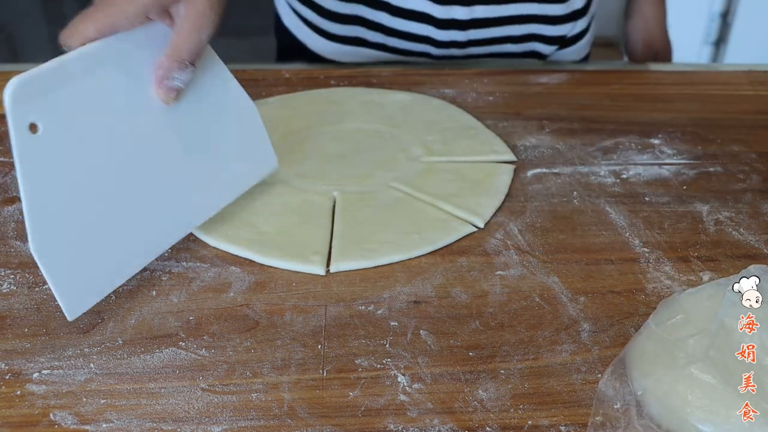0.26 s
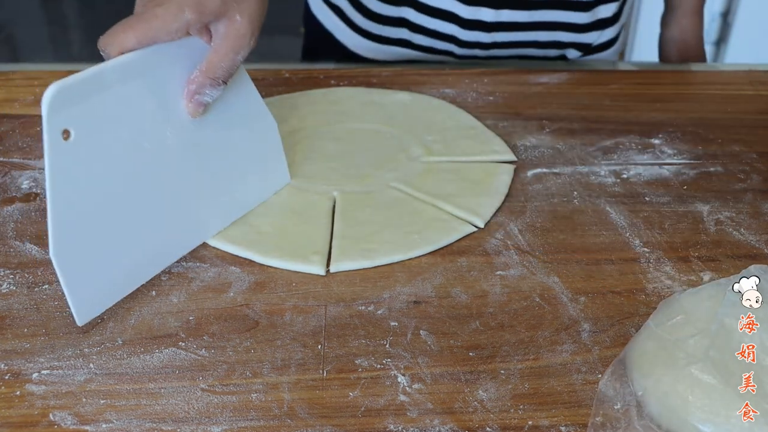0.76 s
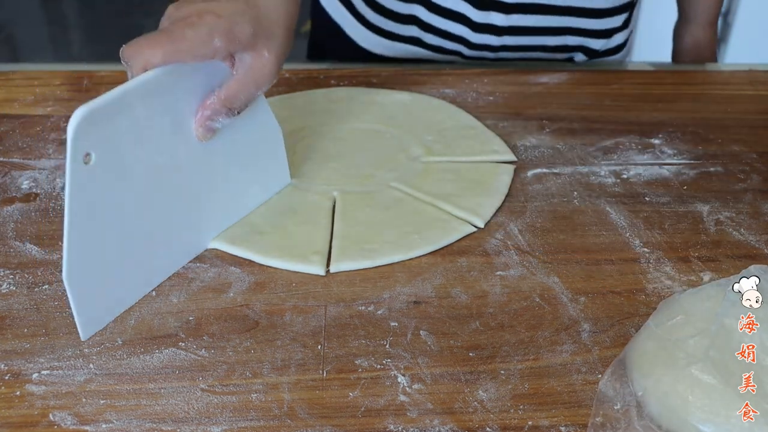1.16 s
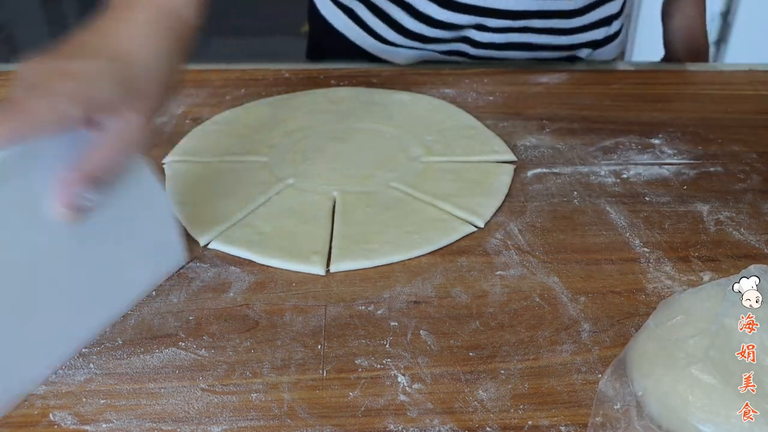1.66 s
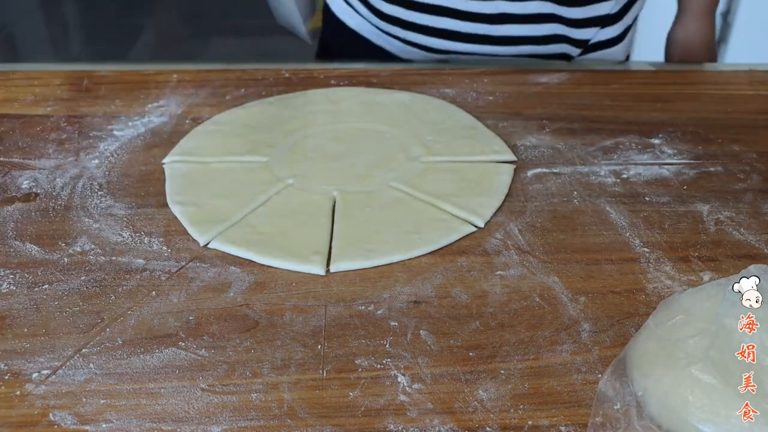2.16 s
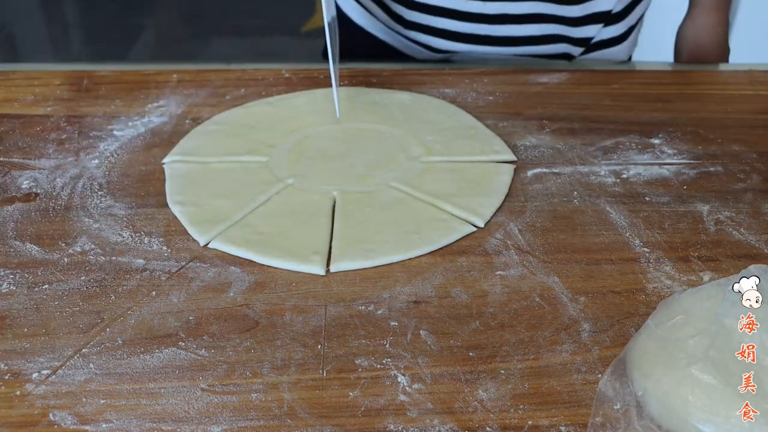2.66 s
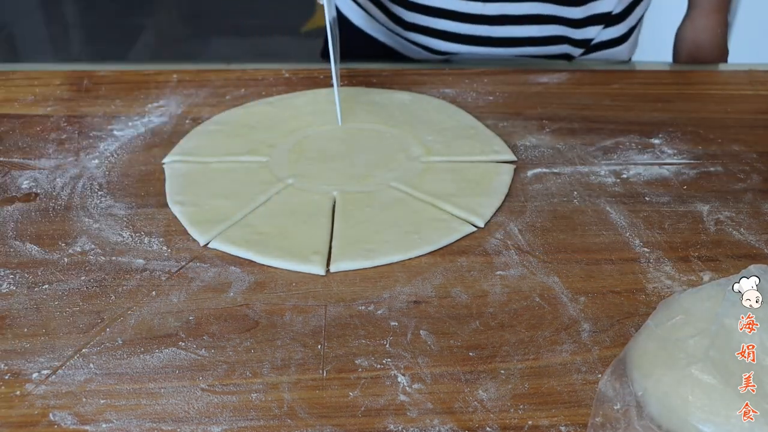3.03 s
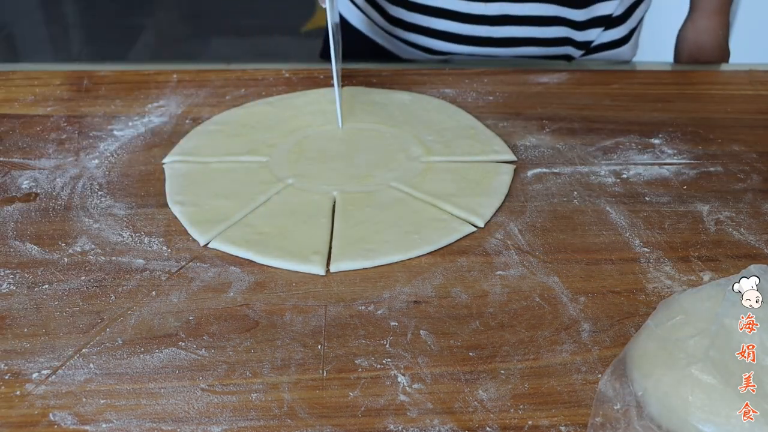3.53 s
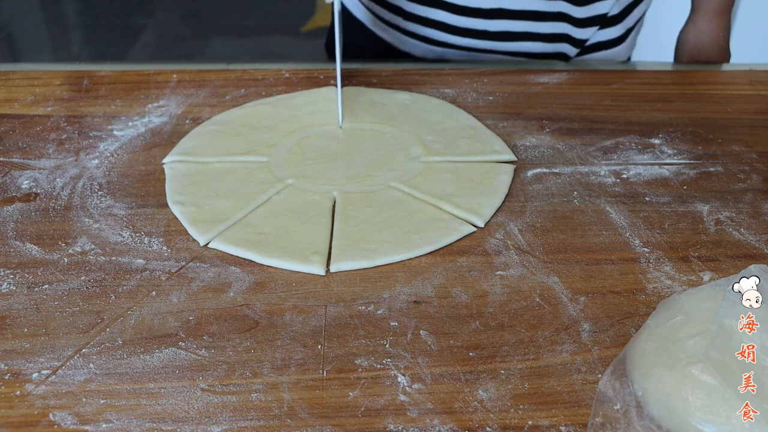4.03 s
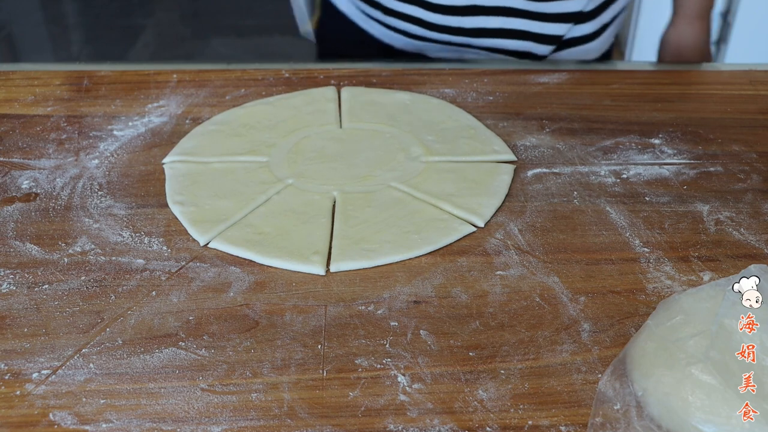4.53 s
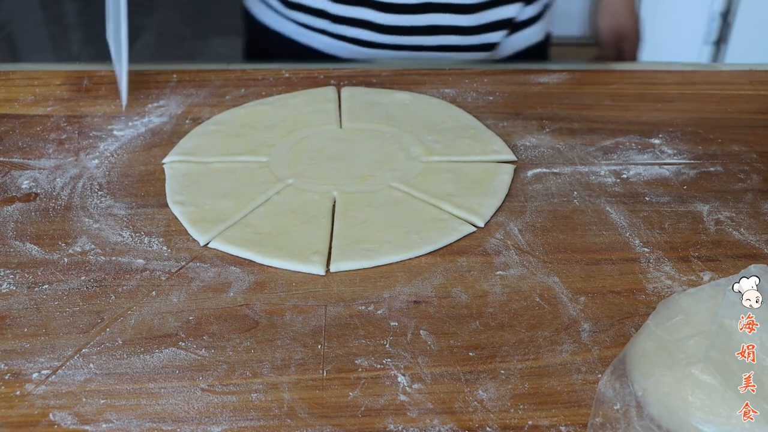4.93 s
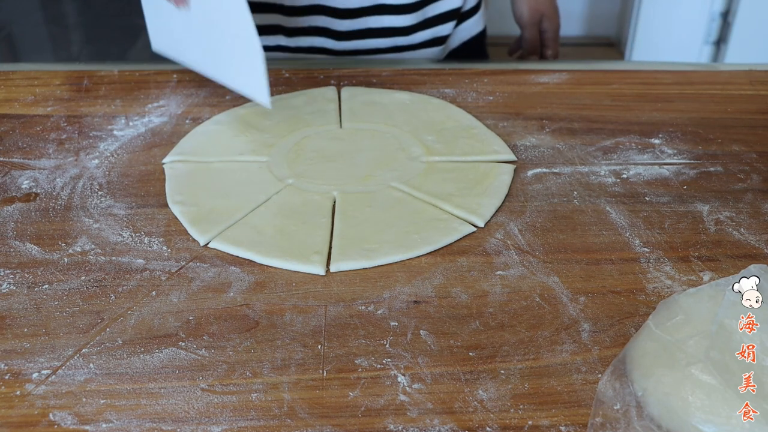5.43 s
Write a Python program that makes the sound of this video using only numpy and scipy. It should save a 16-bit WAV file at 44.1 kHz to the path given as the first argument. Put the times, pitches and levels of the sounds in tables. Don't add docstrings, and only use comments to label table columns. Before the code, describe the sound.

Close stereo view of a plastic scraper cutting dough on a floured wooden board: sleeve rustle, small ticks and a low creaking press, a short ringing gritty drag, quiet rustling, then a chattering landing, a second drag and one hard rap on the wood, echoing in a live kitchen over faint appliance hum.

```python
import sys
import numpy as np
from scipy import signal
from scipy.fft import rfft, irfft
from scipy.io import wavfile
from scipy.ndimage import uniform_filter1d

SR = 44100
rng = np.random.default_rng(int(sys.argv[2]) if len(sys.argv) > 2 else 0)


def magnitude_from_level(level_db):
    exponent = np.asarray(level_db, float) / 20
    return 10 ** exponent


def to_wav(s):
    ch = np.atleast_2d(s).T
    pcm = np.round(np.clip(ch, -1, 1) * 32767)
    wavfile.write(sys.argv[1], SR, pcm.astype(np.int16))


N = 250929
RAP_S = 5.07485


def evened(x):
    return x / np.sqrt(np.mean(x ** 2) + 1e-20)


def read(points, hz):
    f, value = np.transpose(points)
    return np.interp(np.log(hz + 1), np.log(f + 1), value)


def add(mix, s, sound):
    part = mix[..., round(s * SR):][..., :sound.shape[-1]]
    part += sound[..., :part.shape[-1]]


def resonate(x, hz, width):
    turn = np.exp(2j * np.pi * np.cumsum(hz * np.ones(len(x))) / SR)
    r = np.exp(-np.pi * width / SR)
    return 2 * (turn * signal.lfilter([1 - r], [1, -r], x / turn)).real


def coloured(x, points):
    length = x.shape[-1]
    gain = magnitude_from_level(read(points, np.fft.rfftfreq(length, 1 / SR)))
    return evened(irfft(rfft(x) * gain, length))


def grit(length, per_s, spread_db):
    size = rng.standard_normal(length) * magnitude_from_level(spread_db * np.minimum(rng.exponential(1, length), 3))
    return size * (rng.random(length) < per_s / SR)


def placed(x, pan_db):
    return np.array([x * magnitude_from_level(pan_db / 2), x * magnitude_from_level(-pan_db / 2)])


def ring(hz, t60, contact_ms, length=12000):
    t = np.arange(length) / SR
    onset = 1 - np.exp(-(1000 * t / contact_ms) ** 2)
    return magnitude_from_level(-60 * t / t60) * np.sin(2 * np.pi * hz * t) * onset


def fade(length):
    return signal.windows.tukey(length, min(500 / length, 1))


def swell(peak, rise, fall):
    t = np.arange(max(peak - rise, 0), peak + fall, 1 / SR)
    ends_db = -23
    return t[0], ends_db * np.where(t < peak, (peak - t) / rise, (t - peak) / fall)


# (f/Hz, level/dB per Hz)
AIR_COLOUR = [(15, -45), (30, -14), (65, -11.5), (120, -14), (150, -13), (200, -7.5), (300, -11.5),
              (600, -12), (1150, -16), (1900, -22), (5000, -31), (12500, -36), (15700, -47)]
# (f/Hz, likeness)
AIR_LIKENESS = [(40, 0.93), (150, 0.85), (300, 0.85), (600, 0.51), (1200, 0.37), (2400, 0.027),
                (6000, 0.028), (15000, 0.009)]
# (f/Hz, left-right level/dB)
AIR_TILT = [(60, -2.5), (240, -0.2), (950, -0.9), (3800, -1.1), (15000, -.4)]


def air():
    frames, hz = N // 512 + 5, np.fft.rfftfreq(2048, 1 / SR)
    a, b, c, d, patches = rng.standard_normal((frames, 1025, 5)).T
    patches = evened(uniform_filter1d(uniform_filter1d(patches, 20, 0), 8, 1))
    same = read(AIR_LIKENESS, hz)[:, None]
    left = a + 1j * b
    right = same * left + np.sqrt(1 - same ** 2) * (c + 1j * d)
    colour = placed(magnitude_from_level(read(AIR_COLOUR, hz)), read(AIR_TILT, hz))[:, :, None]
    z = np.array([left, right]) * colour * magnitude_from_level(1.3 * patches)
    return magnitude_from_level(-54) * evened(signal.istft(z, nperseg=2048, noverlap=1536)[1][:, :N])


# (f/Hz, width/Hz, level/dB, steady share)
APPLIANCE_TONES = [(64, 17, -65, .1), (98.3, 2, -61, 0.7), (134.5, 10, -57.5, 0.71),
                   (212.5, 9.4, -57.5, 0.36), (428, 4.8, -84, .2), (501.5, 15, -67.5, 0.21),
                   (634.4, 7.5, -66.5, 0.28)]


def appliances():
    out = np.zeros(N)
    for hz, width, db, steady in APPLIANCE_TONES:
        tone = np.sqrt(2) * np.sin(2 * np.pi * (hz * np.arange(N) / SR + rng.random()))
        waver = evened(resonate(rng.standard_normal(N), hz, width))
        out += magnitude_from_level(db) * (steady * tone + (1 - steady) * waver)
    return out


# (f/Hz, level/dB per Hz)
RUSTLE_BODY = [(1200, 6.5), (2200, 9), (3500, 5.5), (4800, 2.5), (6500, -13.5), (12000, -20)]


def rustle(level_db, body_db, pan_db, fizz):
    length = len(level_db)
    shared = grit(length, 14000, 2.7)
    grains = np.array([0.35 * shared + grit(length, 12000, 2.1) for ear in "lr"])
    mix = coloured(grains, fizz) + magnitude_from_level(body_db) * coloured(grains, RUSTLE_BODY)
    return mix * placed(magnitude_from_level(level_db) * fade(length), pan_db)


# (f/Hz, level/dB per Hz)
CLOTH_FIZZ = [(4000, -7), (6500, -4), (9000, -6.5), (12000, -3), (14000, -8), (15600, -17), (16200, -45)]
# (peak t/s, rise t/s, fall t/s, level/dB, relative body level/dB)
SWISHES = [(.012, 0.055, 0.14, -55, -12), (.15, 0.11, .6, -74, 0), (.65, 0.031, 0.027, -67.5, 10.5),
           (.858, 0.051, .03, -73, -8), (1.15, 0.62, 0.17, -73, 10), (1.752, 0.054, .08, -60.5, 9),
           (1.885, .05, .14, -56, -7), (1.964, 0.097, .1, -54.5, -5), (2.152, .18, .3, -55, -5.5),
           (2.43, 0.49, 0.17, -64, -3), (2.5, .06, .08, -72.5, 14), (3.658, .03, .04, -70, 6),
           (3.92, .01, 0.082, -69, 9), (4.55, .3, .9, -63, -1), (1.81, .1, .1, -68, 6),
           (4.698, .04, 0.089, -54, -8), (5.07, .12, 0.13, -62, 0), (5.216, 0.095, 0.12, -56, -5),
           (5.27, 0.053, 0.17, -68, 12.5)]


def swishes():
    out = np.zeros((2, N))
    for peak, rise, fall, db, body_db in SWISHES:
        s, shape_db = swell(peak, rise, fall)
        add(out, s, rustle(db + shape_db, body_db, -.3, CLOTH_FIZZ))
    return out


# (f/Hz, level/dB per Hz)
FLOUR_FIZZ = [(4000, -9), (6500, -5.5), (9000, -7), (12000, -4), (14000, -9), (16000, -45)]
# (t/s, peak level/dB, f/Hz, relative treble level/dB, left-right level/dB)
TICKS = [(.1094, -54, 4000, 3, -2), (.142, -68, 4000, 6.5, 0), (.2044, -63, 4000, 9, -2),
         (0.3137, -62, 4000, 7.5, -1), (.39, -63, 4000, 7, -1), (0.4583, -38.5, 1630, -20, -5),
         (0.51, -58, 4000, 4, -1), (.6464, -52, 4300, -10.5, -5), (0.7279, -43, 4400, -7.5, -2),
         (0.7717, -38, 1400, -19.5, -1), (0.8085, -44, 4300, -11, -1), (.839, -63, 4000, 5, -1),
         (.8564, -62.5, 4000, 11, 0), (0.8981, -33, 1200, -27, 0), (.9344, -64, 4000, 5, -1),
         (1.068, -43, 3950, -7, -1), (1.1832, -31, 900, -30, -3), (1.2221, -31, 1500, -32, -1),
         (1.8734, -37, 2040, -14, -7), (3.6572, -41.5, 2070, -17, -1), (5.3648, -38, 1500, -28, -5)]


def ticks():
    out = np.zeros((2, N))
    for s, db, hz, treble_db, pan_db in TICKS:
        spit_db = treble_db - 60 * np.arange(400) / SR / 0.0053
        spit = coloured(rng.standard_normal(400), FLOUR_FIZZ) * magnitude_from_level(spit_db)
        crack = ring(hz, .004, .12, length=400) + spit
        add(out, s, placed(magnitude_from_level(db) * crack, np.clip(pan_db, -6, 6)))
    return out


# (left t/ms, left signed gain, right t/ms, right signed gain)
WALL_ECHOES = [(10.1, .2, 9.3, .25), (11.5, .16, 10.6, -.45), (12.6, .4, 13.5, .33),
               (16.2, .27, 14.9, -.22), (19.3, -.14, 16, .28), (22.2, .15, 21, -.3),
               (26.5, .23, 28.7, -.17), (43.8, -.15, 38.5, .28)]


def echoes(x):
    taps = np.zeros((2, 2500))
    for left_ms, left, right_ms, right in WALL_ECHOES:
        taps[0, round(left_ms * SR / 1000)] = left
        taps[1, round(right_ms * SR / 1000)] = right
    taps = signal.lfilter(*signal.butter(1, [300 / (SR / 2), 3200 / (SR / 2)], "band"), taps)
    return signal.oaconvolve(x.mean(0)[None], taps, axes=1)[:, :N]


# (f/Hz, t60/s)
KITCHEN_DECAY = [(130, 0.15), (300, 0.63), (600, 0.63), (1200, 0.54), (2400, 0.6), (5000, 0.6),
                 (12000, 0.49)]
# (f/Hz, likeness)
TAIL_LIKENESS = [(60, .98), (180, .98), (300, .93), (640, .55), (1400, .2), (3100, .1), (15000, .1)]


def kitchen(x):
    taps = np.zeros((2, SR))
    at = np.arange(320, SR - 20, 20) + rng.integers(0, 20, (2, (SR - 321) // 20))
    np.put_along_axis(taps, at, rng.choice([-1., 1.], at.shape), 1)
    hz, t, z = signal.stft(taps, SR, nperseg=256)
    same = read(TAIL_LIKENESS, hz)[:, None]
    z[1] = same * z[0] + np.sqrt(1 - same ** 2) * z[1]
    fall_db = -60 * t / read(KITCHEN_DECAY, hz)[:, None]
    decay = magnitude_from_level(1.39 * fall_db) + magnitude_from_level(-7.5 + 0.66 * fall_db)
    tail = signal.istft(z * decay, SR, nperseg=256)[1]
    tail *= 1 - np.exp(-np.arange(tail.shape[1]) / SR / 0.0023)
    return signal.fftconvolve(x[None], tail / np.linalg.norm(tail[0]), axes=1)[:, :N]


# (f/Hz, level/dB per Hz)
BLADE_COLOUR = [(300, -37.5), (600, -5.5), (800, 8.5), (1000, 4.5), (1500, 5), (2300, -7), (3300, -15.5),
                (6000, -38), (12000, -54)]


def scrape(level_db, rumble_db, low_hz, high_hz, ring_db, upper_db):
    length = len(level_db)
    judder = evened(uniform_filter1d(uniform_filter1d(rng.standard_normal(length), 700), 700))
    slips = grit(length, 9000, 2.0) * magnitude_from_level(0.9 * judder)
    wobble, catch = (evened(uniform_filter1d(rng.standard_normal(length), 900)) for k in "ab")
    lower = magnitude_from_level(ring_db) * evened(resonate(slips, low_hz * (1 + 0.024 * wobble), 69))
    upper = magnitude_from_level(upper_db - 2 + 2 * catch) * evened(resonate(slips, high_hz, 300))
    blade = (coloured(slips, BLADE_COLOUR) + lower + upper) / np.sqrt(1 + magnitude_from_level(ring_db) ** 2)
    board = evened(resonate(resonate(slips, 350, 380), 350, 380))
    return (magnitude_from_level(level_db) * blade + magnitude_from_level(rumble_db) * board) * fade(length)


# (peak t/s, rise t/s, fall t/s, board rumble level/dB, relative blade level/dB)
PUSHES = [
    (1.15, .5, 0.38, -57.5, -1),
    (1.07, .03, 0.11, -56, -5),
    (1.235, .08, .08, -54, -8),
    (1.748, .08, .05, -46, -2),
    (1.892, 0.039, 0.046, -68.5, 12),
    (3.83, .2, 0.071, -53, -3),
    (3.885, .02, .06, -56, -7),
    (4.05, 0.029, 0.11, -53, -3),
    (4.466, .04, .08, -49.5, -8),
    (4.01, .05, .08, -49, -12),
]


def pushes():
    out = np.zeros((2, N))
    for peak, rise, fall, db, blade_db in PUSHES:
        s, shape_db = swell(peak, rise, fall)
        sound = scrape(db + blade_db + shape_db, db + shape_db, low_hz=880, high_hz=2080,
                       ring_db=-8, upper_db=-17)
        add(out, s, placed(sound, -1.5))
    return out


# (t/s, pressure level/dB, lower blade ring f/Hz)
DRAGS = [
    [(1.25, -68, 1290), (1.305, -51, 1390), (1.376, -44, 1310), (1.42, -46.5, 1340), (1.445, -42.5, 1330),
     (1.51, -46, 1310), (1.63, -46, 1530), (1.72, -47.5, 1140), (1.80, -66, 1150)],
    [(4.05, -61, 1220), (4.1, -51.5, 1370), (4.165, -48, 1420), (4.224, -50, 1490), (4.3, -48, 1200),
     (4.414, -45, 1300), (4.455, -48.5, 990), (4.5, -57.5, 930), (4.62, -64, 900)],
]
# (lower ring level/dB, upper ring first f/Hz, last f/Hz, upper level/dB, left-right level/dB)
GRIPS = [
    (-4, 2050, 2000, -7, -5),
    (-6.5, 1700, 2500, -3, -1.5),
]
# (relative level/dB, relative body level/dB, left-right level/dB)
FLOUR_HISS = [
    (-8, 8.5, 1.5),
    (-14, 5, -1),
]


def stroke(rows, grip, flour):
    s, level, bend = np.transpose(rows)
    t = np.arange(s[0], s[-1], 1 / SR)
    ring_db, first_hz, last_hz, upper_db, pan_db = grip
    hiss_db, body_db, hiss_pan_db = flour
    mid_db = -45.5
    over_db = np.interp(t, s, level) - mid_db
    sound = scrape(mid_db + over_db, -61.5 + .3 * over_db, np.interp(t, s, bend),
                   np.linspace(first_hz, last_hz, len(t)), ring_db, upper_db + .7 * over_db)
    pressed_db = 1.3 * np.minimum(over_db, -4.5)
    sag_db = 9 * (t - t.mean())
    hiss = rustle(mid_db + hiss_db + pressed_db - sag_db, body_db, hiss_pan_db, FLOUR_FIZZ)
    return s[0], placed(sound, pan_db), hiss


# (f/Hz, level/dB, t60/s)
BOARD_MODES = [(214, -13, 0.092), (292, -15, 0.09), (396, -6.5, 0.055), (484, 5, 0.016), (653, -7.5, 0.039),
               (794, -2.5, 0.035), (1200, 11.5, 0.0059), (1670, 4, .008), (2100, -17, .006)]
# (t/s, peak level/dB, contact t/ms)
THUDS = [
    (1.742, -35, 0.74),
    (3.85, -35.5, 1.4),
    (3.9212, -29.5, .2),
    (3.9349, -29, 0.55),
    (3.9492, -28, 0.65),
    (3.958, -34, 0.54),
    (3.9946, -31.5, 1),
    (4.0438, -41, 0.53),
    (4.446, -40, 0.64),
]


def thuds():
    out = np.zeros((2, N))
    for s, db, ms in THUDS:
        board = 0
        for hz, level, t60 in BOARD_MODES:
            softened = 1 + (hz * ms / 1000) ** 2
            board = board + magnitude_from_level(level) * ring(hz, t60, 0.42 + 60000 / hz ** 2) / softened
        add(out, s, -magnitude_from_level(db) * board)
    return out


# (t/s, f/Hz, level/dB, t60/s, rise t/ms)
BOOMS = [
    (3.9265, 136, -25.5, 0.25, 19),
    (5.082, 137, -24.5, 0.23, 14),
    (4.73, 67, -52, 10, 680),
]


def booms():
    out = np.zeros(N)
    for s, hz, db, t60, ms in BOOMS:
        add(out, s, magnitude_from_level(db) * ring(hz, t60, ms, length=SR + SR // 4))
    return out


# (f/Hz, left signed gain, right signed gain, t60/s)
RAP_MODES = [(806, -.35, -1.4, .007), (1054, -3, -.45, .011), (1077, 1.05, -1.3, .019), (1490, 3, 3, .005),
             (2100, .9, 1.5, .006), (2505, 0, -.55, .01)]
# (f/Hz, level/dB, t60/s, rise t/ms)
AFTER_RINGS = [(275, -28, 0.074, 5.8), (352, -27.5, 0.33, 15), (400, -24.5, 0.28, 4.5),
               (503, -25.5, 0.22, 7.3), (651, -21.5, 0.11, 2.2), (2890, -20, 0.012, 0.87),
               (4740, -22, 0.0043, 0.35), (6400, -22.5, .003, .3), (8500, -27, .003, 0.18),
               (12000, -38, .003, .2)]


def knock():
    out = np.zeros((2, N))
    blade = sum(np.array([[left], [right]]) * ring(hz, t60, 1.3) for hz, left, right, t60 in RAP_MODES)
    table = sum(magnitude_from_level(db) * ring(hz, t60, ms) for hz, db, t60, ms in AFTER_RINGS)
    rap = blade + table
    add(out[0], RAP_S, rap[0])
    add(out[1], RAP_S + 2 / SR, rap[1])
    return out


# (f/Hz, level/dB per Hz)
FAR_RAP_COLOUR = [(120, -52), (200, -19), (237, -29), (343, -6), (382, -19.5), (505, -6), (709, -10.5),
                  (951, -1.5), (1290, -7), (1740, -10), (1900, -18), (2980, -36.5), (8000, -75),
                  (10400, -95), (17600, -120)]


def far_rap():
    pulse, out = np.zeros(1024), np.zeros(N)
    pulse[512] = 1
    sound = np.hanning(1024) * coloured(pulse, FAR_RAP_COLOUR) / np.sqrt(1024)
    add(out, RAP_S - 384 / SR, magnitude_from_level(13) * sound)
    return out


def scene():
    drag, hiss, rap = pushes(), swishes(), knock()
    for rows, grip, flour in zip(DRAGS, GRIPS, FLOUR_HISS):
        s, blade, fizz = stroke(rows, grip, flour)
        add(drag, s, blade)
        add(hiss, s, fizz)
    near = drag + thuds() + ticks()
    room = echoes(rap + magnitude_from_level(-3.5) * near) + kitchen(far_rap() + magnitude_from_level(-6.5) * near.mean(0))
    return near + hiss + rap + booms() + room + air() + appliances()


def roll_off(x):
    return signal.sosfilt(signal.butter(12, 15830, fs=SR, output="sos"), x)


def record(dry):
    thinned = signal.lfilter(*signal.butter(1, 30 / (SR / 2), "high"), dry)
    return roll_off(np.clip(thinned, -.98, .98))


dry = scene()
out = record(dry)
to_wav(out)
```